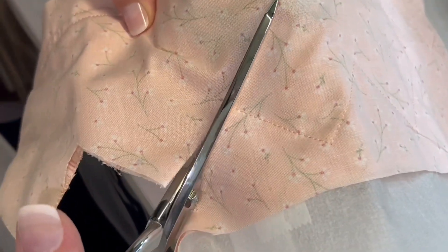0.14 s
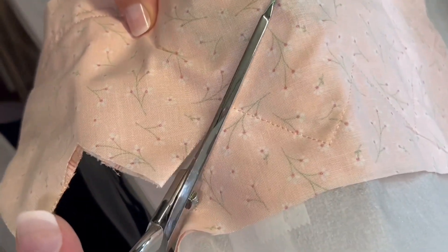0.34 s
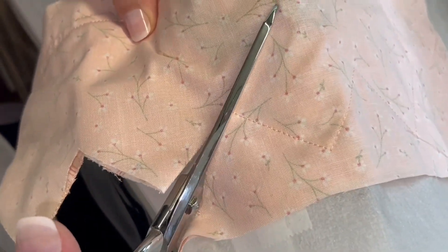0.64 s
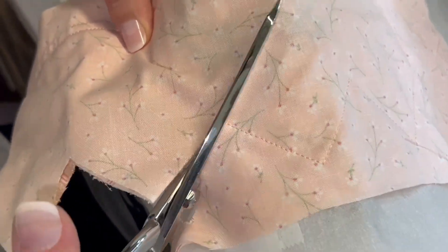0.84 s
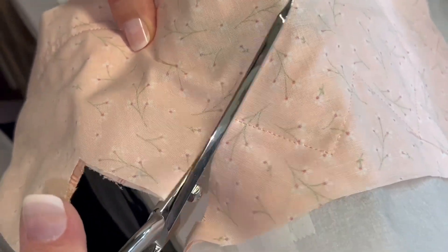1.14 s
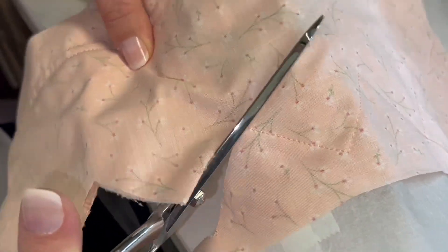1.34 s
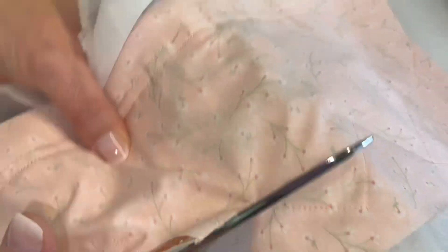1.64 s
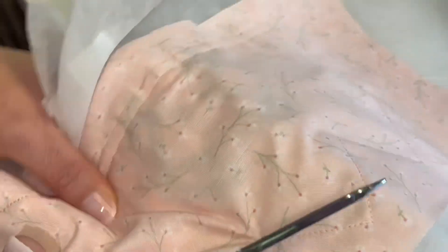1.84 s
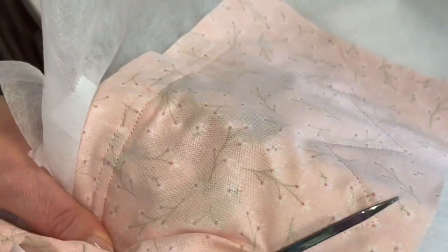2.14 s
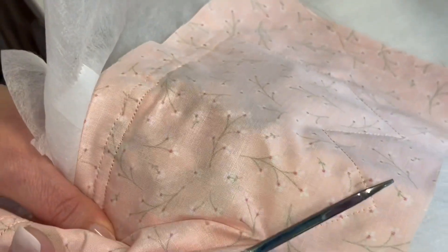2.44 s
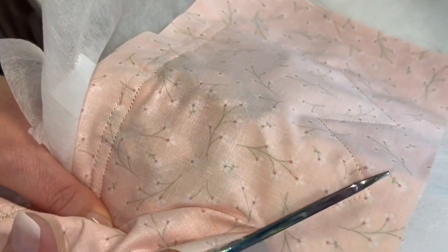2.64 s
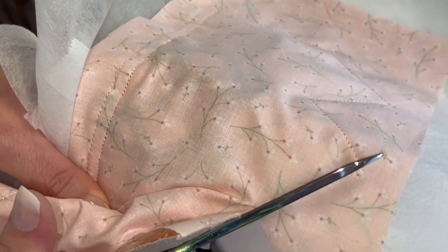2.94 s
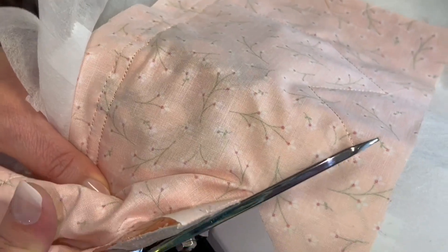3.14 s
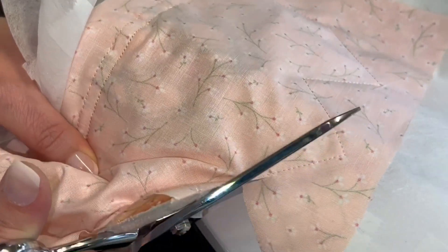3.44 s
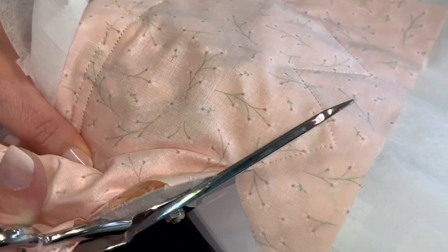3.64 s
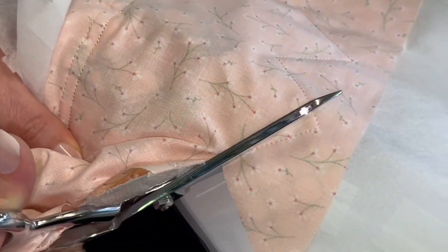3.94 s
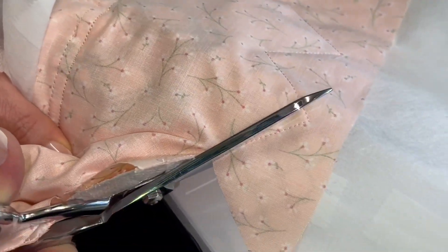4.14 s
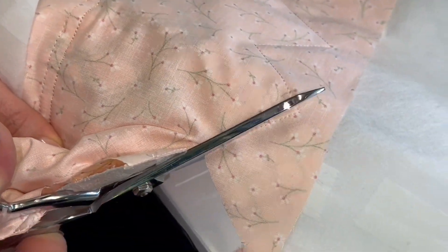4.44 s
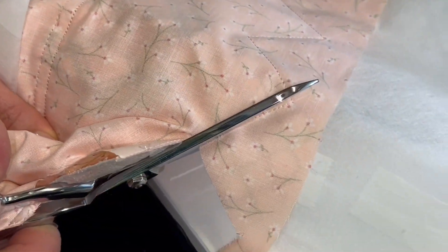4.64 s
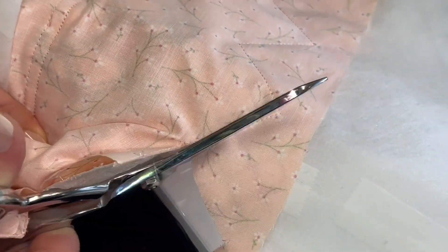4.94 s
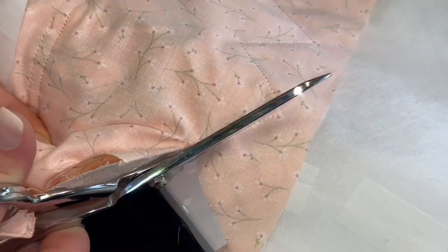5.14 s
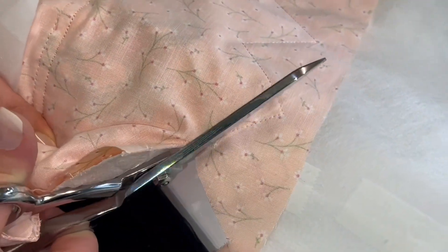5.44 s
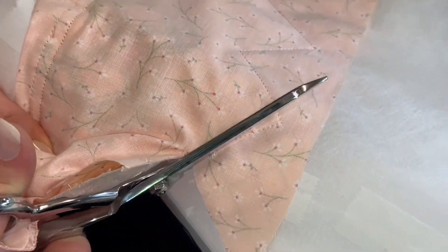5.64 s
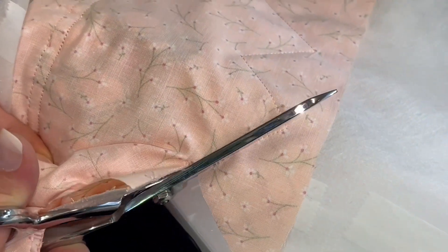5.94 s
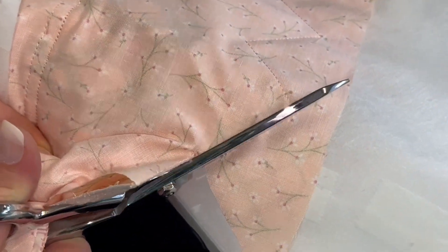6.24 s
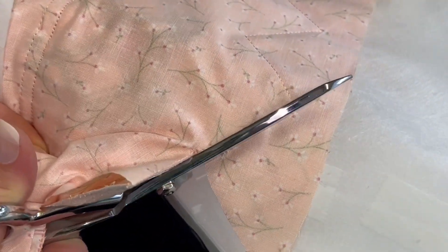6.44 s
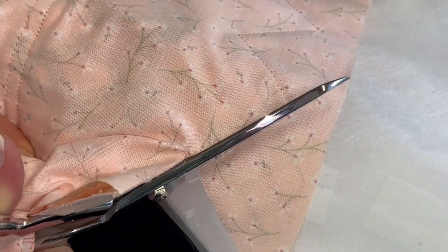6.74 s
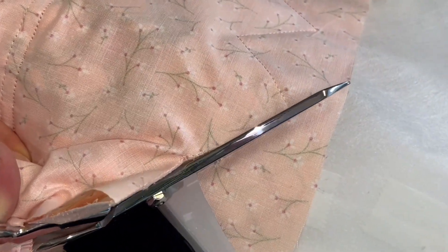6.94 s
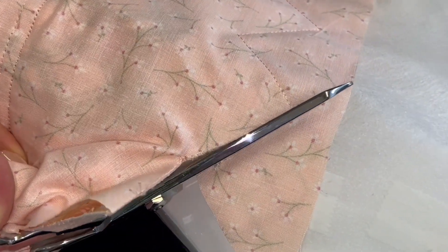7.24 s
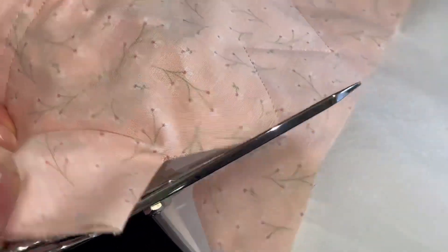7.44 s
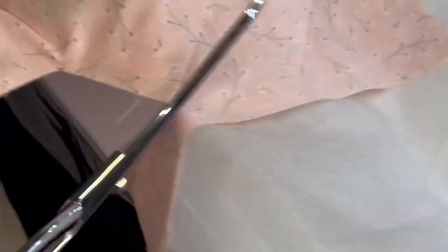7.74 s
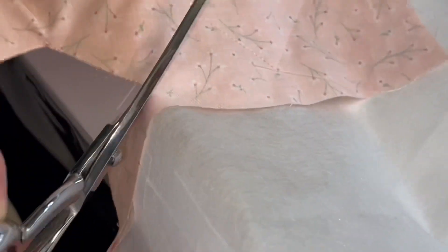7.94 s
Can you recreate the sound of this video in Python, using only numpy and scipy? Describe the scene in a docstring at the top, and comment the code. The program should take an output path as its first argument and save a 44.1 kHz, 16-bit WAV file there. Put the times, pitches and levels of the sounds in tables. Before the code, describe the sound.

Steel scissors snip crisply through layered fabric in three runs, with cloth swishing and rustling over a steady low hum.

```python
"""Steel scissors cut layered fabric close to a stereo recorder, in a quiet room with a strong low hum.
First the cloth swishes as its threads rub, and the blades scrape and snap a few threads, so the steel
rings. The cloth is turned, rustling, with small ticks and soft pops. From about 2.4 s come three runs
of cuts through bunches of threads, the last the longest. At 7.3 s the pivot squeaks once as the
handles open, and the cloth swishes again to the end."""
import sys
import numpy as np
from scipy import signal
from scipy.fft import rfft, irfft, next_fast_len
from scipy.io import wavfile
from scipy.ndimage import uniform_filter1d

SR = 44100
rng = np.random.default_rng(int(sys.argv[2]) if len(sys.argv) > 2 else 0)


def master(y):
    """Save y as 16-bit WAV."""
    cut = np.clip(np.atleast_2d(y).T, -1, 1)
    pcm = np.round(cut * 32767)  # scale
    wavfile.write(sys.argv[1], SR, pcm.astype(np.int16))


N = 356769

# the blades biting through bunches of threads: peak_s, level_db, rise_ms, treble_db (against the middle)
THREAD_BITES = [(0.022, -50, 1.5, -8), (.177, -59, 3.1, 0), (.205, -56.5, 6.5, -1), (2.445, -61, 2.1, -2),
                (2.531, -50.5, 5, 4), (2.5926, -45, 1.6, 8), (2.6835, -59.5, 4, -5),
                (2.7377, -56.5, 5.3, -1), (2.781, -52, 7.3, 4.5), (2.81, -52, 7, 2),
                (2.8576, -52.5, 4.9, 3.5), (2.9136, -45.5, 3.8, 2), (2.993, -55.5, 7.6, 4),
                (3.0137, -56, 6, 3), (3.0514, -55.5, 3.6, 10), (4.214, -56, 5, -4), (4.231, -51.5, 4, -2),
                (4.352, -48.5, 2.2, 4.5), (4.3655, -46.5, 5.5, 2), (4.501, -57.5, 3.5, -1),
                (4.5225, -48.5, 6.3, 2.5), (4.6515, -44.5, 3.4, 4.5), (5.19, -61, 5, -3),
                (5.235, -62, 5, -4), (5.514, -53, 6.6, -7), (5.8402, -61.5, 4.2, -5),
                (5.884, -51.5, 2.2, 2), (5.914, -51, 10.5, -1.5), (6.0465, -45, 6.2, 6.5),
                (6.111, -56, 2.1, 0), (6.181, -42, 5.2, 5), (6.2496, -48, 5.3, 4.5), (6.29, -60, 5, -1),
                (6.38, -46.5, 5, 4), (6.493, -46.5, 5.7, 4), (6.557, -60.5, 4, 4), (6.5756, -61, 2, 6),
                (6.618, -61, 3.6, 4), (6.6437, -45.5, 4.1, 7), (6.706, -61.5, 5.9, 2),
                (6.799, -45, 3.4, 5.5), (6.8491, -43, 5.3, 3.5), (6.9085, -47.5, 1.8, 4),
                (6.9357, -40, 2.2, 5), (6.959, -56, 3, 6), (6.972, -61, 1.5, 12), (7.062, -43.5, 3.3, 2.5),
                (7.1138, -50, 2.4, 3), (7.136, -38, 4.9, 1.5), (7.197, -51, 4, -2.5),
                (7.444, -58.5, 2.6, -9), (7.696, -56, 5.7, -1)]


def amp(db):
    """Turn decibels into a gain to multiply by."""
    return 10 ** (np.asarray(db) / 20)


def unit(x):
    """Scale x to an average power of 1."""
    return x / np.sqrt(np.mean(np.abs(x) ** 2) + 1e-20)


def along(points, hz):
    """Read a value between (pitch_hz, value) points, with octaves evenly spaced."""
    pitches, values = np.transpose(points)
    return np.interp(np.log(hz + 1), np.log(pitches + 1), values)


def curves(rows):
    """Join timed rows with straight lines: one curve for each column after the time."""
    times, *columns = np.transpose(rows)
    return [np.interp(np.arange(N) / SR, times, column) for column in columns]


def wobble(rate):
    """A random curve that heads for a new value `rate` times a second."""
    knots = rng.standard_normal(int(N * rate / SR) + 2)
    return np.interp(np.arange(N) * rate / SR, np.arange(len(knots)), knots)


def filtered(x, response):
    """Change the strength and phase of each frequency in x by response(hz)."""
    size = next_fast_len(N + 8192)
    return irfft(rfft(x, size) * response(np.fft.rfftfreq(size, 1 / SR)), size)[..., :N]


def noise(colour):
    """Noise of power 1, shaped by (pitch_hz, level_db) points."""
    return unit(filtered(rng.standard_normal(N), lambda hz: amp(along(colour, hz))))


def gritty(slow_db, fast_db):
    """A stuttering gain, as fibres or rough spots on the steel catch and let go."""
    return unit(amp(slow_db * wobble(50) + fast_db * wobble(500)))


def patchy(x, depth_db):
    """Make x louder and softer in random patches of time and pitch."""
    spectrum = signal.stft(x, nperseg=256)[2]
    patches = uniform_filter1d(rng.standard_normal(spectrum.shape[-2:]), size=3, axis=0)
    patches = unit(uniform_filter1d(patches, size=14, axis=1))
    return unit(signal.istft(spectrum * amp(depth_db * patches), nperseg=256)[1][..., :N])


def swells(start_s, hold_s, db, rise_s, fade_s):
    """The gain of sounds that rise, hold and fade; rise_s and fade_s each cover 20 dB."""
    power = np.zeros(N)
    for start, hold, level_db, rise in np.broadcast(start_s, hold_s, db, rise_s):
        first = max(round((start - 3 * rise) * SR), 0)
        last = min(round((start + hold + 3 * fade_s) * SR), N)
        t = np.arange(first, last) / SR - start
        drop_db = 20 * np.maximum(-t / rise, (t - hold) / fade_s).clip(min=0)
        power[first:last] += amp(level_db - drop_db) ** 2
    return np.sqrt(power)


def resonance(force, hz, db, width_hz):
    """A ringing note whose pitch can move: shift the force down by hz, smooth it, shift it back."""
    carrier = np.exp(2j * np.pi * np.cumsum(hz) / SR)
    keep = np.exp(-np.pi * width_hz / SR)
    smoothed = signal.lfilter([1 - keep], [1, -keep], force / carrier)
    return 2 * amp(db) * (smoothed * carrier).real


def hum(pitch_hz=58.71):
    """A nearly pure low tone, with a weak, unsteady tone an octave above."""
    # strength of the hum: time_s, level_db
    levels = [(0.3, -34), (3.29, -33), (7.78, -34), (7.8, -33)]
    phase = 2 * np.pi * pitch_hz * np.arange(N) / SR
    octave = amp(-26 + 3.9 * wobble(2.3)) * np.sin(2 * phase + 0.75 * wobble(2.7))
    gain = amp(curves(levels)[0] + 0.074 * wobble(3.7))
    return np.sqrt(2) * gain * (np.sin(phase) + octave)


def room():
    """Steady noise from all around: alike left and right in bass and treble, less so in between."""
    # colour of the room noise: pitch_hz, level_db (per Hz)
    colour = [(18, -94.5), (35, -74.5), (70, -68), (92, -73), (118, -73), (150, -74.5), (200, -82.5),
              (300, -92), (450, -99.5), (800, -99), (1500, -106), (2500, -111), (4000, -119), (7000, -125),
              (12500, -127), (16000, -133)]
    # how alike left and right are: pitch_hz, likeness (1 is the same)
    likeness = [(60, 0.93), (130, 1), (290, 0.87), (640, 0.19), (1410, 0.66), (3100, 1), (6000, 1),
                (15000, 0.93)]

    def response(hz):
        spread = np.arccos(np.clip(along(likeness, hz), -1, 1)) / 2
        return np.sqrt(SR / 2) * amp(along(colour, hz)) * [np.cos(spread), np.sin(spread)]

    mid, side = filtered(rng.standard_normal((2, N)), response)
    return np.array([mid + side, mid - side])


def drag(offset_db):
    """Each bite drags cloth and blade edges along: a gain that swells and fades around it."""
    peak_s, level_db = np.transpose(THREAD_BITES)[:2]
    return swells(peak_s, 0, level_db + offset_db, rise_s=0.044, fade_s=0.063)


def cloth():
    """Rubbing threads make a bright swish; moving folds make a dull rustle that spreads wider."""
    # moves of the cloth: start_s, hold_s, level_db, hiss_db (against that level)
    moves = [(0, 0.23, -67.5, 2.5), (0.264, 0.089, -78.5, -6.5), (0.473, 0.018, -82.5, -9),
             (0.537, 0.014, -71.5, -0.5), (.67, .04, -80, -2), (0.732, 0.086, -59.5, -1.5),
             (1.011, 0.013, -72, -3), (1.226, 0.047, -71.5, -5), (1.359, 0.033, -67, 2),
             (1.42, .08, -74.5, -6), (1.485, 0.2, -69, -3), (1.698, 0.13, -72, -6.5),
             (1.838, 0.064, -61, 0), (1.926, 0.071, -65, -1.5), (2.02, 0.092, -71, -2),
             (2.51, 0.13, -73.5, -6), (2.8, 0.28, -69, -0.5), (3.157, 0.065, -65, -9),
             (3.255, .15, -73, -8), (3.373, .03, -73.5, 1.5), (3.464, 0.27, -75.5, -12.5),
             (3.92, 0.026, -75, -2), (4.154, 0.15, -84.5, -2), (4.597, .05, -71.5, -7.5),
             (4.686, 0.019, -63.5, -2.5), (4.842, 0.1, -57.5, 1.5), (4.976, 0.056, -74.5, -8),
             (5.173, 0.068, -69, -4.5), (5.283, 0.049, -74, -10), (5.371, 0.018, -64.5, -2.5),
             (5.427, 0.056, -68, -10), (5.49, 0.089, -64.5, -3), (5.568, 0.088, -64.5, -14.5),
             (5.705, 0.036, -65, -14.5), (5.758, 0.037, -75, 0), (5.98, .06, -68.5, 3.5),
             (6.211, 0.034, -62, 2.5), (6.32, 0.022, -64.5, -9), (6.893, 0.061, -68, 0),
             (7.31, .07, -70, -7.5), (7.402, 0.083, -59, -4), (7.505, 0.15, -57, -3.5),
             (7.66, 0.094, -63, -1.5), (7.764, 0.12, -69.5, -8), (7.872, .22, -66.5, -5.5)]
    # colour of rubbing threads: pitch_hz, level_db
    thread_colour = [(300, -16.5), (1000, -9.5), (2200, -0.5), (3500, -0.5), (5000, -1.5), (7500, -4),
                     (9000, -28.5), (14000, -66)]
    # colour of their high hiss: pitch_hz, level_db
    hiss_colour = [(4000, -61.5), (7000, -9), (8200, -0.5), (11000, -3), (13000, -4.5), (16000, -5)]
    # colour of heavy layers rubbing: pitch_hz, level_db
    layer_colour = [(700, -30), (1300, -6), (2200, 0.5), (3200, -5.5), (5000, -23.5)]
    # colour of the folds: pitch_hz, level_db
    fold_colour = [(150, -27.5), (300, 0.5), (500, -4), (800, -6.5), (1200, -6.5), (2200, -14.5),
                   (4000, -23.5), (8000, -54)]
    # how the rustle of the folds comes and goes: time_s, level_db
    fold_levels = [(0, -60), (.25, -72), (.6, -62), (1.1, -71.5), (1.37, -54), (1.6, -56.5), (1.77, -72),
                   (2.1, -92), (2.9, -76), (3.3, -63), (3.6, -88), (4.6, -84.5), (5.3, -66.5),
                   (5.43, -55.5), (5.55, -64), (5.73, -59), (5.85, -66), (6.05, -63.5), (6.28, -58),
                   (6.45, -67), (7.0, -65), (7.08, -63), (7.3, -68), (7.58, -57.5), (7.8, -77), (8.09, -61)]
    start_s, hold_s, level_db, hiss_db = np.transpose(moves)
    rise_s = 0.024 * amp(-0.26 * (level_db + 68))  # louder moves start faster
    layer_db = -9.5 - 0.65 * hiss_db  # duller moves have more of the heavy layers
    move_gain, hiss_gain, layer_gain = [swells(start_s, hold_s, level_db + offset, rise_s, fade_s=0.042)
                                        for offset in (0, hiss_db, layer_db)]
    # about 90 times a second a single fibre flicks free
    flicks = 1 + uniform_filter1d((rng.random(N) < 90 / SR) * 40 * rng.random(N), size=30)
    threads = np.hypot(move_gain, drag(-26)) * noise(thread_colour)
    hiss = hiss_gain * noise(hiss_colour)
    layers = layer_gain * patchy(noise(layer_colour), depth_db=5.5)
    swish = gritty(slow_db=1.5, fast_db=2) * flicks * (threads + hiss + layers)
    folds = patchy(noise(fold_colour) + amp(-13) * np.outer([1, -1], noise(fold_colour)), depth_db=3)
    fold_gain = np.hypot(amp(curves(fold_levels)[0] - 5.5), amp(-3.5) * move_gain)
    return swish, fold_gain * gritty(slow_db=3, fast_db=3.5) * folds


def scrape():
    """Edge slides on edge, making a gritty force that shakes the steel in a low and a high range."""
    # strokes of the blades: start_s, hold_s, low_db, high_db
    strokes = [(0, .12, -65, -68.5), (0.195, .15, -68, -73), (2.412, 0.075, -69, -76),
               (2.513, 0.11, -61.5, -64), (2.653, .41, -66.5, -64.5), (3.156, 0.11, -71, -63.5),
               (3.664, 0.06, -75, -72), (3.878, .03, -69, -75.5), (3.914, 0.039, -62.5, -63.5),
               (4.13, 0.16, -68, -74), (4.487, .07, -70, -68), (4.6, 0.062, -72, -65.5),
               (4.69, .03, -65, -54), (5.82, 0.38, -69, -71.5), (6.167, 0.35, -72.5, -65),
               (6.475, 0.099, -76, -69), (6.616, 0.11, -74, -66), (6.753, 0.17, -90, -78),
               (7.063, .16, -67, -68), (7.328, 0.025, -69, -55), (7.36, .04, -67, -66)]
    start_s, hold_s, low_db, high_db = np.transpose(strokes)
    low_gain, high_gain = [swells(start_s, hold_s, db, rise_s=0.021, fade_s=0.014)
                           for db in (low_db, high_db)]
    low_noise = noise([(800, -17), (2300, -2), (7500, -1), (8500, -32), (14000, -69)])
    high_noise = noise([(4000, -60), (7000, -21.5), (8000, -0.5), (12000, -1.5), (16000, -11.5)])
    low = amp(7.5) * np.hypot(low_gain, drag(-23)) * low_noise
    high = amp(0.5) * np.hypot(high_gain, drag(-17)) * high_noise
    return gritty(slow_db=5, fast_db=6) * (low + high)


def blades(force, low_hz=2554, tip_hz=14800):
    """Shaken steel rings at fixed notes, plus three that change with the point where the blades cross."""
    # fixed notes of the steel: pitch_hz, width_hz, level_db
    notes = [(4360, 180, -9.5), (5125, 99, -1.5), (6300, 140, -13.5), (6820, 34, 0), (9720, 350, -2),
             (10860, 120, 2), (11740, 135, 2.5), (13800, 250, -14), (13700, 160, 4.5)]
    # notes that follow the crossing point: time_s, high_hz, high_db, low_db, tip_db (the free tips)
    crossing = [(0, 8200, 21, -17, -1), (.3, 9120, 8.5, -21, -6.5), (.75, 8460, 9, -1, -2),
                (2.5, 8660, 8.5, -12, -13.5), (3.03, 9500, -1.5, -5, -5), (3.3, 8900, 0.5, 3, -7),
                (3.73, 8300, 14.5, -8, 7), (4.22, 9150, 7.5, 5, -4), (4.72, 9180, -3, 8, 3),
                (4.85, 8400, -1, -13, -7), (5.7, 8600, 11, 9, -9), (5.85, 9130, 6.5, 4, -5),
                (6.2, 9220, 5, 4, 1), (6.65, 8570, 3, 13, 4.5), (6.8, 8360, -1, 7, 17),
                (7.35, 8400, 2, -4, 3.5)]

    def response(hz):
        return sum((-1) ** k * amp(db) * 1j * hz * width / (pitch ** 2 - hz ** 2 + 1j * hz * width)
                   for k, (pitch, width, db) in enumerate(notes))

    high_hz, high_db, low_db, tip_db = curves(crossing)
    high = resonance(force, high_hz, high_db, width_hz=168)
    low = resonance(force, np.full(N, low_hz), low_db + 0.98 * wobble(25), width_hz=100)
    tips = resonance(force, np.full(N, tip_hz), tip_db, width_hz=490)
    return filtered(force, response) + high + low + tips


def bites_and_ticks():
    """A bite is a burst of snapping threads that swells and breaks off; a tick is a far shorter one."""
    # dry ticks of single threads and steel: peak_s, level_db, treble_db, bass_db (both against the middle)
    ticks = [(.164, -38.5, -10.5, -3.5), (0.3532, -51, -10, -8), (1.017, -49, -1, -13),
             (1.035, -55, -22, -7), (1.569, -42.5, -9.5, -5), (1.6159, -43.5, -29, -7),
             (1.9322, -47.5, -7, -19), (2.2625, -50.5, -17, -14), (2.288, -58, -15, -10),
             (2.3293, -50, -17, -20), (2.6943, -46, -10, -11), (3.1706, -40, 3, 3.5),
             (5.7133, -47.5, -28, 11), (6.4698, -50, -3, -8), (7.173, -45.5, 2, -11),
             (7.242, -54.5, -7, -11), (7.9464, -49.5, -5, -15)]
    reach = SR // 40  # samples on each side of a peak
    t_ms = np.arange(-reach, reach) / SR * 1000
    bass = [(300, 1), (600, -8), (1800, -6.5), (2600, -22), (6000, -68)]
    middle = [(1000, -0.5), (2000, 4.5), (7500, 4), (9000, -23), (14000, -70)]
    treble = [(4000, -67), (7000, -23), (8500, 6), (13000, 9.5), (16000, -2)]
    snaps = amp(2.7 * wobble(900)) * np.array([noise(band) for band in (bass, middle, treble)])
    snaps = np.pad(snaps, ((0, 0), (reach, reach)))
    bursts = [(s, db, ms, 0.76 * ms, treble_db, -5.5) for s, db, ms, treble_db in THREAD_BITES]
    # a duller tick lasts longer
    bursts += [(s, db, 0.06, 0.58 - 0.03 * treble_db, treble_db, bass_db)
               for s, db, treble_db, bass_db in ticks]
    out = np.zeros(N + 2 * reach)
    for peak_s, level_db, rise_ms, fall_ms, treble_db, bass_db in bursts:
        from_peak = np.where(t_ms < 0, -t_ms / rise_ms, t_ms / fall_ms)
        shape = amp(-8 * from_peak ** 1.07)  # 8 dB down at one rise or fall time from the peak
        span = slice(round(peak_s * SR), round(peak_s * SR) + 2 * reach)
        burst = shape * snaps[:, span]
        # chance sets the grain of a burst, not its energy
        burst *= np.linalg.norm(shape) / np.linalg.norm(burst, axis=1, keepdims=True)
        middle_db = level_db - 10 * np.log10(1 + amp(2 * treble_db))  # middle and treble share the level
        out[span] += amp(middle_db + np.array([bass_db, 0, treble_db])) @ burst
    return out[reach:][:N]


def stereo_blur(sound, fade_s=0.044):
    """A faint, short, dull smear, different left and right, that widens the cutting sounds."""
    t = np.arange(SR // 12) / SR
    tail = rng.standard_normal((2, len(t))) * amp(-60 * t / fade_s)
    tail = signal.lfilter([1], [1, -0.6], tail)  # soften the treble
    delayed = np.pad(sound, (60, 0))[None]
    return signal.fftconvolve(delayed, tail / np.linalg.norm(tail[0]), axes=1)[:, :N]


def pops(rise_s=0.0021, fade_s=0.032):
    """A fold or a stitch gives way: one rough note that starts softly and dies quickly."""
    # soft pops in the cloth: start_s, level_db, pitch_hz
    events = [(1.616, -45.5, 2320), (2.592, -51.5, 1090), (4.652, -49.5, 1140), (5.39, -45, 1650),
              (5.43, -47, 1470), (5.434, -45, 530), (5.714, -47, 2070), (5.716, -43.5, 1020),
              (6.015, -49, 850), (6.04, -51, 840), (6.24, -44, 1500), (6.333, -45.5, 1690),
              (6.496, -48.5, 1210), (6.645, -45, 1270), (6.847, -45.5, 946), (7.136, -42.5, 810),
              (7.19, -48, 455), (7.91, -47.5, 1570), (7.933, -54, 1090), (7.985, -49.5, 1510)]
    out = np.zeros(N + SR)
    t = np.arange(SR // 10) / SR
    shape = amp(0.5 - 60 * t / fade_s) * (1 - np.exp(-t / rise_s))
    roughness = 0.76 * wobble(400)
    for start_s, level_db, pitch_hz in events:
        span = slice(round(start_s * SR), round(start_s * SR) + len(t))
        out[span] += amp(level_db) * shape * np.sin(2 * np.pi * pitch_hz * t + roughness[span])
    return out[:N]


def pivot_squeak(start_s=7.325, from_hz=1610, to_hz=1020, drop_after_s=0.028, glide_s=0.0061):
    """The pivot gives a rough, falling squeak as the handles open; a blade chirps near its start."""
    span = slice(round((start_s - 0.05) * SR), round((start_s + 0.15) * SR))
    t = np.arange(N)[span] / SR - start_s
    pitch_hz = to_hz + (from_hz - to_hz) / (1 + np.exp((t - drop_after_s) / glide_s))
    slips = rng.standard_normal(len(t))
    shaky_hz = pitch_hz * (1 + 0.016 * wobble(200)[span])
    tone = np.sqrt(2) * np.sin(2 * np.pi * np.cumsum(shaky_hz) / SR)
    rasp = unit(resonance(slips, pitch_hz, db=0, width_hz=150))
    squeak = 0.8 * amp(3 * wobble(200)[span]) * tone + 0.5 * rasp
    chirp = unit(resonance(slips, hz=np.full(len(t), 6070), db=0, width_hz=43))
    out = np.zeros(N)
    out[span] = swells(start_s, hold_s=0.08, db=-61, rise_s=0.006, fade_s=0.0086)[span] * squeak
    out[span] += swells(start_s + 0.017, hold_s=0, db=-56.5, rise_s=0.016, fade_s=0.043)[span] * chirp
    return out


def scene():
    """Cloth and scissors close by, over hum and room noise; the scrape is heard only through the steel."""
    swish, rustle = cloth()
    snaps = bites_and_ticks()
    ringing = blades(scrape() + snaps + amp(-15) * swish)  # sliding cloth shakes the steel too
    cutting = amp(-2.5) * snaps + ringing + pops() + pivot_squeak()
    background = hum() * amp([[0.1], [-0.1]]) + room()
    return background + amp(-2) * swish + rustle + cutting + amp(-20.5) * stereo_blur(cutting)


def record(dry, top_hz=15830):
    """The recorder's two sides fall out of step in the treble, and nothing above top_hz gets through."""
    # how far the left side runs ahead of the right: pitch_hz, lead_radians
    left_lead = [(20, 0), (2400, 0), (3100, .5), (3900, .25), (4900, 0), (8600, 0), (9200, -1.8),
                 (9750, -2.7), (10500, -3.4), (11800, -6.2), (12300, -6.4), (13600, -9.3), (14350, -9.8),
                 (15200, -12.1), (15900, -12.8)]
    return filtered(dry, lambda hz: np.exp(0.5j * np.outer([1, -1], along(left_lead, hz))) * (hz < top_hz))


dry = scene()
out = record(dry)
master(out)
```